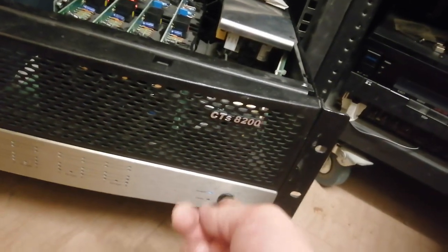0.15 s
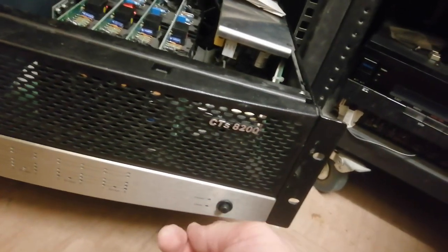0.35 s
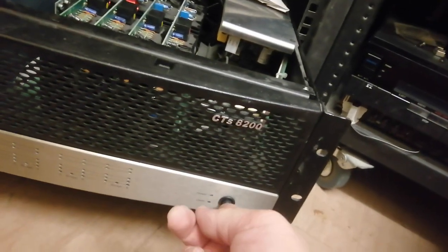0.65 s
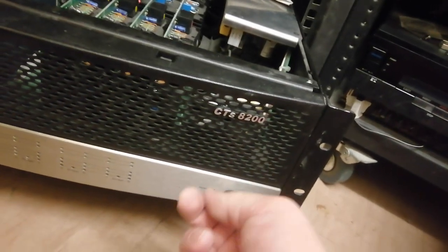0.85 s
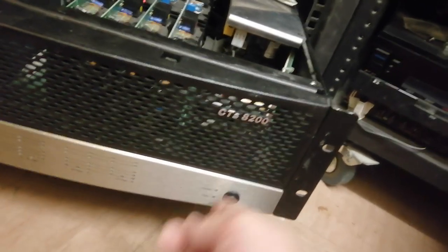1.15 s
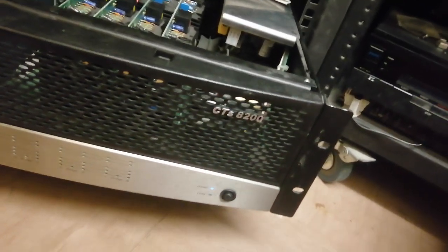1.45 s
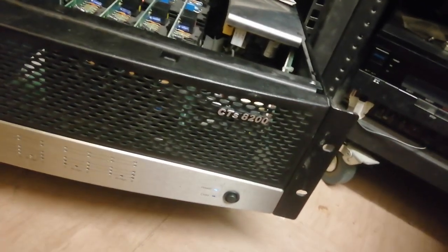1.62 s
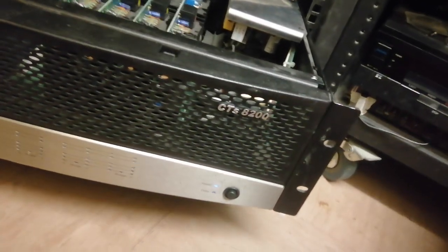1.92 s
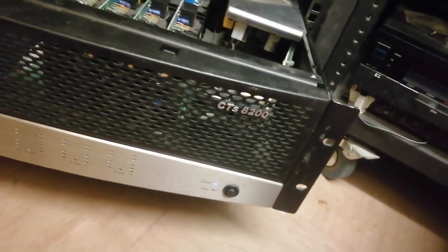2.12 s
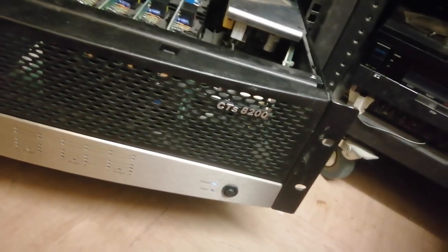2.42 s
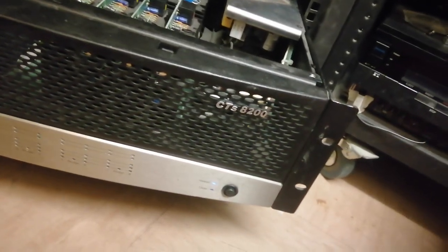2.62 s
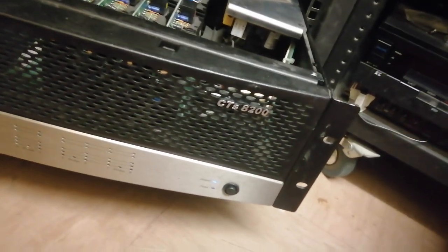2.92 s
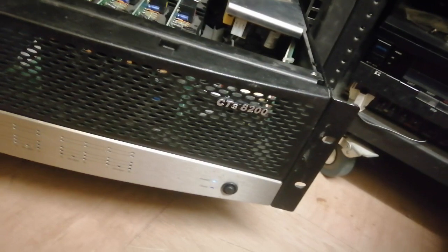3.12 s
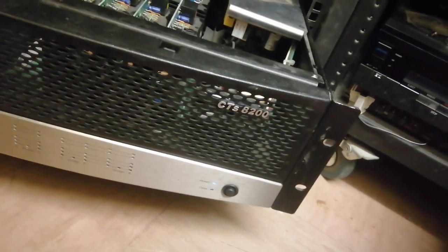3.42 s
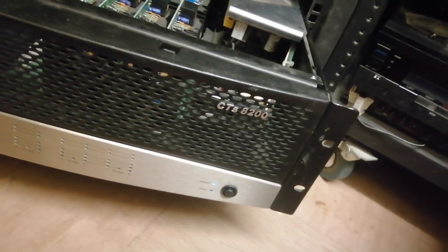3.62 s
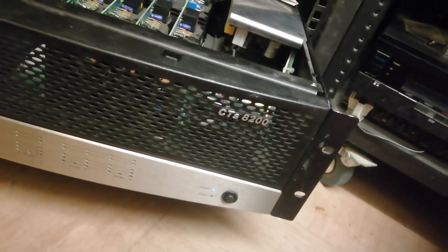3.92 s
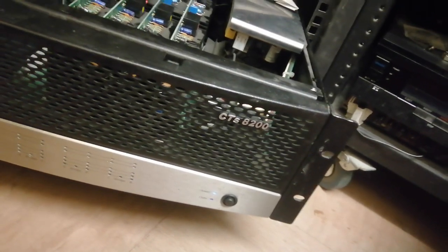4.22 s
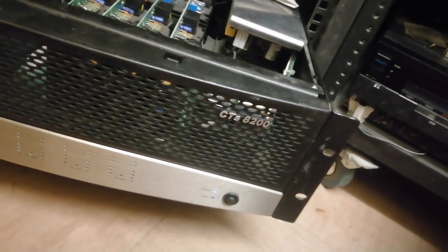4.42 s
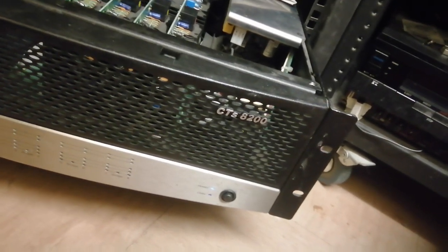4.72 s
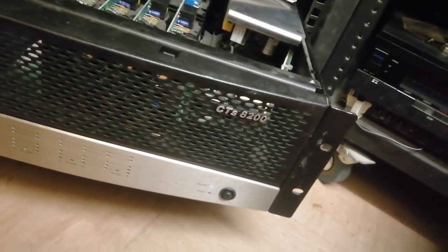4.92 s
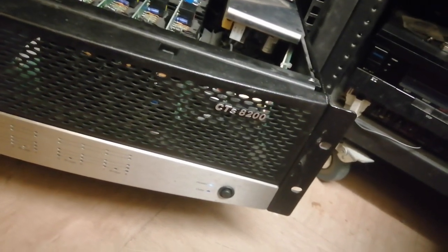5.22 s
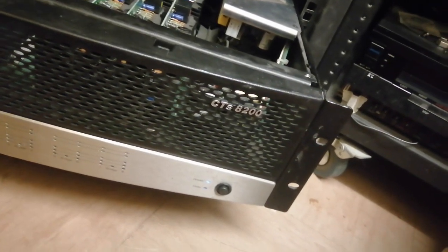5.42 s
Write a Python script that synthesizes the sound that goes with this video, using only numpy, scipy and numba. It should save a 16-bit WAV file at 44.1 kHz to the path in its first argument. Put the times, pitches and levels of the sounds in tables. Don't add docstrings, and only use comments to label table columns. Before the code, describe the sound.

Bright, dry metallic clicks from an open rack amplifier: in-out, a pause, in-out, with faint finger rubs around them. A very faint high-pitched squeal follows, cut by a small relay tick. Then only quiet mains hum, airy fan noise and distant machinery swelling softly, until one strong relay clack late on. Handheld phone close to the front panel, slightly stronger on the right, short room reflections, background dipping after each snap.

```python
import sys
import numpy as np
from scipy import signal
from scipy.fft import rfft, irfft
from scipy.io import wavfile
from scipy.ndimage import uniform_filter1d
from numba import njit

SR = 44100
rng = np.random.default_rng(int(sys.argv[2]) if len(sys.argv) > 2 else 0)


def waveform_to_disk(signal):
    frames = np.transpose(np.atleast_2d(signal))
    scaled = np.clip(frames, -1, 1) * 32767
    samples = np.round(scaled).astype(np.int16)
    wavfile.write(sys.argv[1], SR, samples)


def ratio(d):
    e = np.asarray(d, float) / 20
    return 10 ** e


N = 244887
T = np.arange(N) / SR


def read(table, hz):
    f, v = np.transpose(table)
    return np.interp(np.log(np.maximum(hz, 1)), np.log(f), v)


def colour(x, db):
    return irfft(rfft(x) * ratio(db), x.shape[-1])


def unit(x):
    return x / np.sqrt(np.sum(x ** 2))


def slow(width_hz):
    k = max(int(SR / width_hz / 2), 2)
    z = rng.standard_normal((2, N))
    for _ in range(3):
        z = uniform_filter1d(z, k)
    return (z[0] + 1j * z[1]) / np.sqrt(np.mean(z ** 2) * 2)


def causal(db, size):
    c = irfft(np.maximum(db, -70) * np.log(10) / 20, size)
    c[..., 1:size // 2] *= 2
    c[..., size // 2 + 1:] = 0
    return np.exp(rfft(c))


# frequency in Hz, level in dB per Hz.
FAN_WASH = [(22, -85.5), (30, -87.5), (38, -94), (45, -84.5), (80, -85.5), (130, -93), (220, -97),
            (420, -101), (750, -103), (1300, -105)]
# frequency in Hz, level in dB per Hz.
HISS = [(1300, -105), (2000, -109), (3300, -111), (3900, -119), (5300, -112), (7000, -115), (8200, -122),
        (10000, -120), (13500, -117.5), (15000, -111.5), (15900, -122), (16300, -150)]
# frequency in Hz, left minus right in dB.
AIR_PAN = [(60, -2), (110, -11), (200, -5.5), (380, -13), (700, -4), (1290, -7), (2380, -1), (4400, -7.5),
           (8120, -4.5), (15000, -5.5)]
# frequency in Hz, likeness 0 to 1.
AIR_ALIKE = [(30, 1), (130, .75), (300, 0.7), (650, .15), (1200, 0)]


def air():
    f = np.fft.rfftfreq(N, 1 / SR)
    right, other = rfft(rng.standard_normal((2, N)) * np.sqrt(SR / 2))
    alike = np.clip(read(AIR_ALIKE, f), 0, 1)
    left = (alike * right + np.sqrt(1 - alike ** 2) * other) * ratio(read(AIR_PAN, f))
    level = ratio(read(FAN_WASH + HISS[1:], f)) * (f > 12)
    return irfft(np.array([left, right]) * level, N)


def swells(rows, idle_db):
    rise_s, fall_s = 0.16, 0.091
    gain = ratio(idle_db)
    for s, hold, db in rows:
        rise = np.clip((T - s) / rise_s + 1, 0, 1) ** 2
        gain = gain + ratio(db) * rise * np.exp(-np.maximum(T - s - hold, 0) / fall_s)
    return gain


# centre in Hz, width in octaves, idle level in dB.
RUMBLE_BANDS = [
    (330, .28, -86.5),
    (915, 1, -89.5),
    (105, .1, -81.5),
]
# start in seconds, hold in seconds, level in dB.
DRONE_SWELLS = [(-.05, .1, -74), (1.195, 0.24, -64.5), (2.45, 0.47, -78), (3.65, 0.4, -73),
                (4.833, 0.14, -76)]
# start in seconds, hold in seconds, level in dB.
WASH_SWELLS = [(-.05, 0.093, -77.5), (1.2, 0.23, -73), (2.55, 0.33, -78), (4.85, 0.14, -82.5)]
# start in seconds, hold in seconds, level in dB.
SHAFT_SWELLS = [(3.5, .2, -75.5), (4.22, 0.74, -71.5), (5.1, 0.45, -77)]


def rumble_bands():
    out = np.zeros((2, N))
    f = np.fft.rfftfreq(N, 1 / SR)
    for rows, (hz, octaves, idle_db) in zip((DRONE_SWELLS, WASH_SWELLS, SHAFT_SWELLS), RUMBLE_BANDS):
        distance = np.log2(np.maximum(f, 1) / hz) / octaves
        far = colour(rng.standard_normal(N), -np.minimum(6 * distance ** 2, 90))
        ports_db = np.array([[-5], [2.5]])
        out += far / far.std() * swells(rows, idle_db) * ratio(1.5 * slow(16).real + ports_db)
    return out


# time in seconds, centre in Hz, width in Hz, level in dB, length in seconds.
SCRAPES = [(2.635, 7000, 500, -77, .025), (3.9, 3350, 200, -79, .03)]


def scrapes():
    out = np.zeros((2, N))
    f = np.fft.rfftfreq(N, 1 / SR)
    for at, hz, width, db, length in SCRAPES:
        rub = colour(rng.standard_normal((2, N)), -np.minimum(12 * ((f - hz) / width) ** 2, 90))
        out += rub / rub.std() * ratio(db) * np.exp(-((T - at) / length) ** 2)
    return out


# frequency in Hz, right level in dB, left minus right in dB,
# left phase lead in radians, wander 0 to 1, wander width in Hz.
HUM = [(49, -58, -8, -.12, .5, 10), (158, -70, -10.5, -.9, .35, 5.0), (300.1, -66.5, -8, -.06, .12, 4.0),
       (479, -78, -14.5, -1.6, 0.9, 4.0), (549, -68, -14, -1.5, .12, 5.3),
       (627.4, -78.5, -15.5, 1.4, .3, 3.6)]


def hum():
    out = np.zeros((2, N))
    for hz, db, pan_db, lead, wander, width in HUM:
        wander = np.clip(wander, 0, 1)
        drift = np.sqrt(1 - wander ** 2) + wander * slow(width)
        line = ratio(db) * np.sqrt(2) * drift * np.exp(2j * np.pi * hz * T)
        out += np.array([(line * ratio(pan_db) * np.exp(1j * lead)).real, line.real])
    return out


# time in seconds, lift in dB.
HAND = [(0, 5.5), (.9, 4.5), (1.2, 0.5), (5.6, 0)]


def background():
    steady = hum() + air() + rumble_bands() + scrapes()
    bass = signal.sosfilt(signal.butter(1, 400, fs=SR, output="sos"), steady[0])
    steady[0] += bass * (ratio(np.interp(T, *np.transpose(HAND))) - 1)
    return steady


# time in seconds, pitch in Hz, level in dB.
WHINE = [(1.32, 5560, -74), (1.334, 5680, -72), (1.38, 5670, -68.5), (1.437, 5520, -72)]


def whine():
    s, hz, db = np.transpose(WHINE)
    gain = ratio(np.interp(T, s, db, -140, -140)) * np.sqrt(2)
    phase = 2 * np.pi * np.cumsum(np.interp(T, s, hz)) / SR
    tone = np.exp(1j * phase) * (1 + .2 * slow(130))
    return gain * np.array([(tone * ratio(-7.5) * np.exp(.5j)).real, tone.real * ratio(5.5)])


# start in seconds, pitch in Hz, peak in dB, T60 in seconds, swell in seconds.
PANELS = [(.213, 612, -52, 0.25, .012), (.213, 730, -53, 0.21, .012), (.213, 1164, -45.5, 0.079, .004),
          (1.11, 518.6, -50.5, 0.3, .02), (1.11, 695, -56.5, 0.28, 0.017), (1.11, 400, -55, .3, .02),
          (1.11, 868, -50, 0.2, 0.006), (4.936, 728, -43, 0.21, 0.0049), (4.936, 643, -41, 0.12, 0.0089),
          (4.936, 791, -55, 0.31, .006), (4.936, 915, -53.5, 0.16, .004), (1.233, 1340, -57, 0.22, 0.0036),
          (.381, 1335, -66, .25, .004), (.991, 1290, -56, .15, .004), (4.936, 1843, -53, 0.13, .003)]


def lid():
    out = np.zeros((2, N))
    flutter = 1 + 0.351 * slow(49.83).real
    lead, ports_db = np.array([[.6], [0]]), np.array([[-3], [2.5]])
    for s, hz, db, t60, swell in PANELS:
        t = np.maximum(T - s, 0)
        tone = ratio(db - 60 * t / t60) * (1 - np.exp(-t / swell)) * flutter
        out += tone * np.sin(2 * np.pi * hz * t + lead) * ratio(ports_db)
    return out


# frequency in Hz, T60 in seconds.
ROOM_T60 = [(500, 0.34), (1500, 0.23), (3000, 0.24), (6000, .27), (10000, 0.21), (16000, 0.21)]
# frequency in Hz, level in dB.
ROOM_COLOUR = [(500, 3), (1500, 0), (3500, 2.5), (6000, -3), (10000, -4), (16000, -1.5)]


def room(size=16384):
    t, f, out = T[:size], np.fft.rfftfreq(size, 1 / SR), 0
    noise = rfft(rng.standard_normal((2, size)))
    for hz in 300 * 2 ** np.arange(0, 6.5, .5):
        octaves = np.log2(np.maximum(f, 1) / hz)
        band = np.cos(np.pi * np.clip(octaves, -.5, .5)) ** 2
        decay = ratio(read(ROOM_COLOUR, hz) - 60 * t / read(ROOM_T60, hz))
        out = out + irfft(noise * band, size) * decay
    return unit(out * (1 - np.exp(-t / 0.024)))


# delay in
# milliseconds, level in dB.
ECHOES = [(11, -12), (19, -18.5), (29, -20.5), (44, -24.5)]


def echoes(near):
    heard = near.copy()
    for k, (lag, db) in enumerate(ECHOES):
        for port in (0, 1):
            ms = lag + .7 * port * (-1) ** k
            heard[port] += ratio(db) * np.roll(near[1 - port], int(ms * SR / 1000))
    return heard


def bounces(rise, bounce, lead, span, count=420):
    when, shared, left, right = rng.random((4, count))
    ms = when * (rise + bounce) * 4 - rise * 4
    force = np.where(ms < 0, np.exp(ms / rise), np.exp(-np.abs(ms / bounce / 1.23) ** 1.4))
    at = np.clip(lead + ms * SR / 1000, 0, span - 1).astype(int)
    own = np.array([left, right]) - .5
    cracks = np.zeros((2, span))
    np.add.at(cracks, (slice(None), at), force * (shared - .5 + 1.8 * own))
    return unit(cracks)


# frequency in Hz, T60 in seconds.
CHASSIS_T60 = [(500, 0.132), (1500, 0.16), (3000, 0.12), (6000, 0.039), (10000, .03), (16000, 0.022)]


def chassis_modes(size, count=400):
    hz = 400 + 15900 * ((np.arange(count) + rng.random(count)) / count) ** 1.5
    t60 = read(CHASSIS_T60, hz) * ratio(0.77 * rng.standard_normal(count))
    ring = np.exp(np.outer(2j * np.pi * hz - np.log(1000) / t60, T[:size]))
    return np.sqrt(np.gradient(hz) / t60), ring


def chassis(strength, ring):
    turn = np.exp(2j * np.pi * rng.random((2, len(strength))))
    body = ((strength * turn) @ ring).imag
    return unit(body * (1 - np.exp(-T[:ring.shape[1]] / 0.00065)))


# time in seconds, strength in dB, left minus right in dB,
# rise in milliseconds, bounce in milliseconds.
SNAPS = [
    (0.0647, -24.5, -3.5, 0.53, 3.14),
    (0.2114, -15.5, -1.5, 1.3, 7.5),
    (0.9904, -16, -3.5, 0.43, 5.1),
    (1.1083, -19.5, -5.5, 1.23, 5.13),
    (1.4394, -37, -6.5, .4, 3.0),
    (4.9345, -19, -4.5, .2, 5.5),
]
# time in seconds, strength in dB, left minus right in dB,
# rise in milliseconds, bounce in milliseconds.
TOUCHES = [
    (0.039, -55.5, -3, 1.9, 6.0),
    (.19, -50, 0.5, 0.83, 6.0),
    (.38, -47, -1, 0.4, 11),
    (0.968, -53.5, 1, .25, 11),
    (1.2315, -43.5, -2.5, 0.396, 11),
]
# frequency in Hz, level in dB per Hz.
BUTTON_COLOURS = [
    [(590, -63.5), (1000, -37), (1450, -18), (1810, -27.5), (2360, -4), (3150, -10.5), (3420, -23),
     (4900, -13.5), (5500, -0.5), (10800, -4.5), (14900, -1), (16000, -10)],
    [(260, -44), (450, -20.5), (616, -19), (1150, -12.5), (1810, -15), (2100, -5), (3760, -16),
     (6240, -0.5), (12000, -17), (15100, -14.5), (16000, -28)],
    [(470, -45.5), (800, -17.5), (1110, -28), (1260, -11.5), (1390, -13.5), (1740, -18.5), (2350, -0.5),
     (2950, -10.5), (4630, -13), (5650, -3.5), (7000, 1.5), (9330, -5), (14700, -7.5), (16000, -16)],
    [(260, -44), (450, -14.5), (546, -12), (782, -18.5), (868, -12.5), (1120, -11.5), (1500, -5),
     (2160, -11.5), (2470, -1), (3700, -16.5), (6730, 0.5), (9070, -14), (15100, -16), (16000, -22)],
]
# frequency in Hz, level in dB per Hz.
RELAY_COLOURS = [
    [(1760, -62), (3000, -27), (3750, -37), (3890, -47), (4500, -17), (6440, -7.5), (7780, -14),
     (16000, -15.5)],
    [(480, -45.5), (800, -24), (1300, -22), (1880, -14.5), (2240, -25.5), (3720, -14.5), (4350, -19.5),
     (4930, -10), (6280, 0.5), (9270, -16.5), (10100, -5), (11100, -19.5), (15000, -16.5), (16000, -26.5)],
]
# frequency in Hz, level in dB per Hz.
TOUCH_COLOURS = [
    [(2500, -22), (4500, -0.5), (8000, 0.5), (11000, -22.5)],
    [(530, -38), (900, -15), (1850, 3), (3870, -14), (5510, 4.5), (15000, -9.5)],
    [(530, -47), (900, -22.5), (1690, 2), (1940, -12), (2160, 0.5), (3830, -27), (5000, -22), (6500, -68),
     (11000, -120)],
    [(530, -43), (900, -20), (1400, -3.5), (2690, 0), (3450, -6), (5150, -0.5), (12000, -13), (15600, -50),
     (22000, -120)],
    [(650, -45), (1100, -22), (1340, -2), (1920, -10), (2580, -10), (4000, -29), (5200, -55), (8800, -120)],
]
# frequency in Hz, left minus right in dB.
PORTS = [(500, -4.5), (1500, 5.5), (4000, -5), (6000, -5), (7500, 0.5), (10000, 5), (15000, -3)]


def snaps(size=4096, span=32768):
    ring_db, room_db, lumps_db = -3, -7, 2.5
    lead = 400
    out, f = np.zeros((2, N + span)), np.fft.rfftfreq(span, 1 / SR)
    strength, ring = chassis_modes(size)
    colours = BUTTON_COLOURS + RELAY_COLOURS + TOUCH_COLOURS
    for (s, db, pan_db, rise, bounce), table in zip(SNAPS + TOUCHES, colours):
        near = bounces(rise, bounce, lead, span)
        near[:, lead:lead + size] += chassis(strength, ring) * ratio(ring_db)
        heard = echoes(near)
        tail = room()
        heard[:, lead:lead + tail.shape[1]] += tail * ratio(room_db)
        side = np.outer([.5, -.5], pan_db + read(PORTS, f))
        lumps = uniform_filter1d(uniform_filter1d(rng.standard_normal(len(f)), size=110), size=110)
        shape = read(table, f) + side + lumps_db * lumps / lumps.std()
        shape = shape - np.maximum(f - 16100, 0) * .05
        heard = irfft(rfft(heard) * causal(shape, span), span)
        start = int(s * SR) - lead
        out[:, start:start + span] += unit(heard) * ratio(db + 22)
    return out[:, :N]


def scene():
    return background() + whine() + lid() + snaps()


@njit
def follow(x, attack, release):
    e, out = 0., np.empty(len(x))
    for i in range(len(x)):
        e += (x[i] - e) * (attack if x[i] > e else release)
        out[i] = e
    return out


def gain_control(dry):
    threshold_db, attack_s, release_s = -50, 0.0065, 0.098
    split_hz, bass_power, top_power = 500, 0.32, 0.057
    deep_hz, deep_power = 80, .2
    loud = follow(np.abs(dry).max(axis=0), 1 / (attack_s * SR), 1 / (release_s * SR))
    over = np.sqrt(1 + (loud / ratio(threshold_db)) ** 2)
    bass = signal.sosfiltfilt(signal.butter(2, split_hz, fs=SR, output="sos"), dry)
    deep = signal.sosfiltfilt(signal.butter(2, deep_hz, fs=SR, output="sos"), dry)
    bass_out = bass + deep * (over ** -deep_power - 1)
    return bass_out * over ** -bass_power + (dry - bass) * over ** -top_power


def top_cut(x):
    return signal.sosfilt(signal.butter(12, 16810, fs=SR, output="sos"), x)


def record(dry):
    mix = gain_control(dry)
    return top_cut(mix)


dry = scene()
out = record(dry)
waveform_to_disk(out)
```